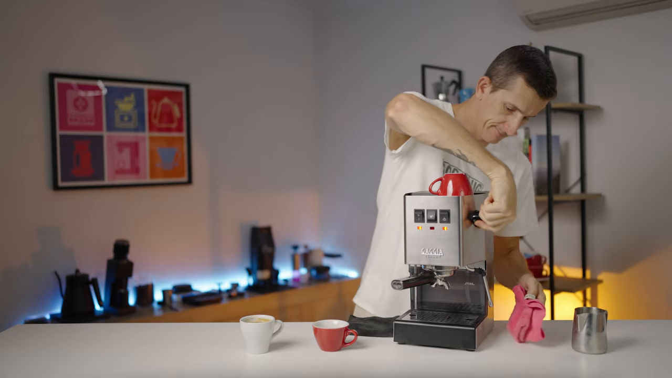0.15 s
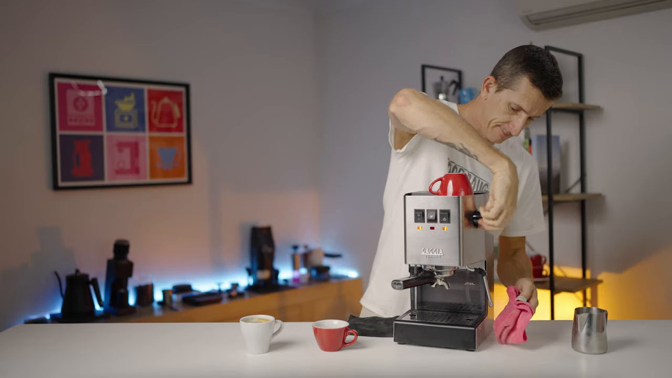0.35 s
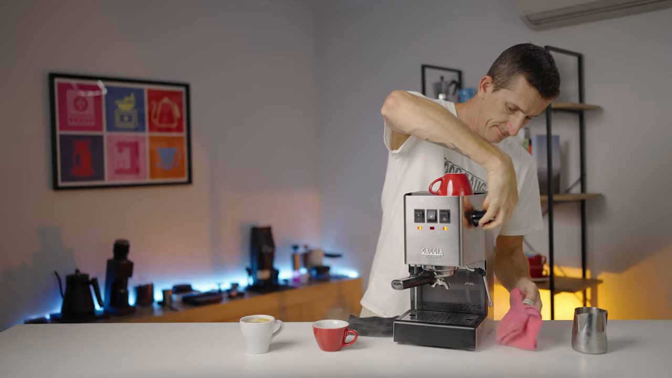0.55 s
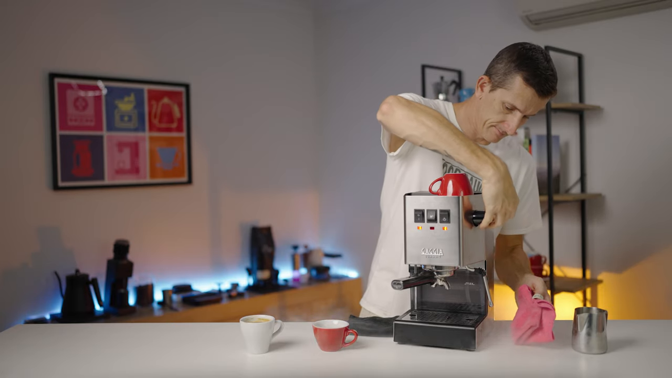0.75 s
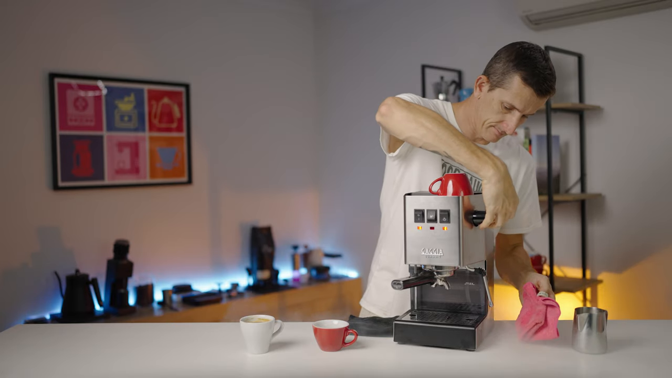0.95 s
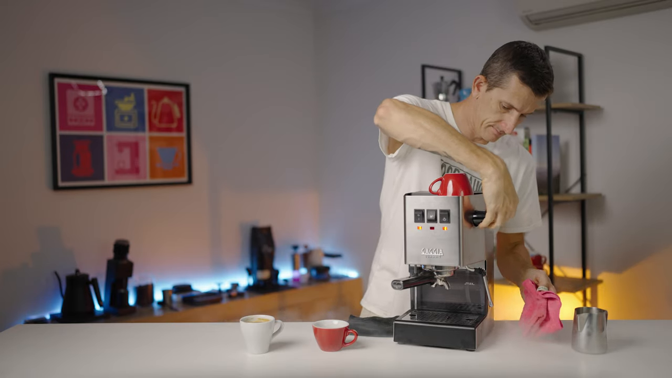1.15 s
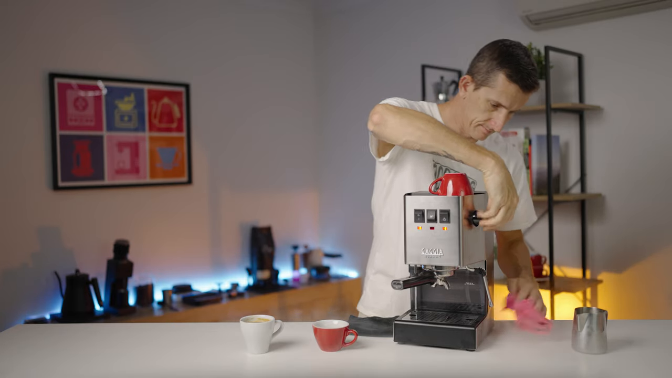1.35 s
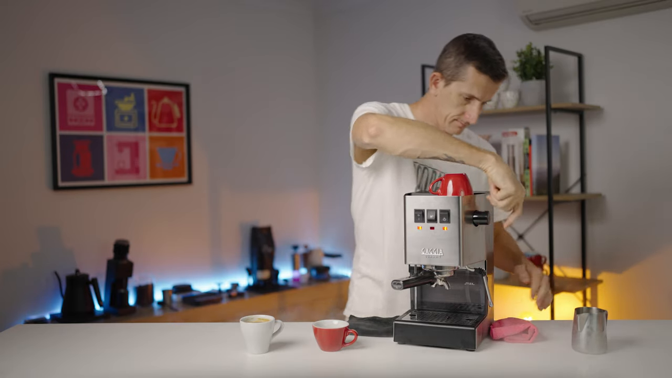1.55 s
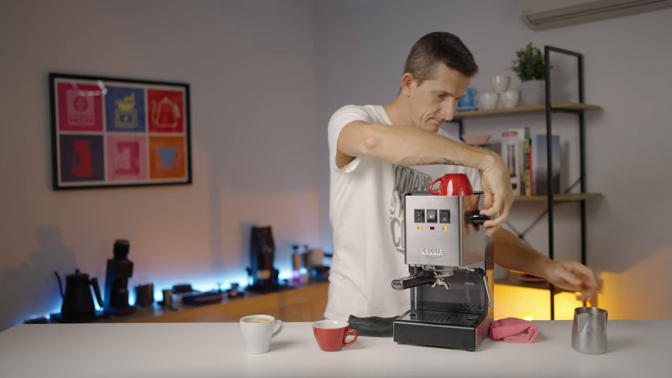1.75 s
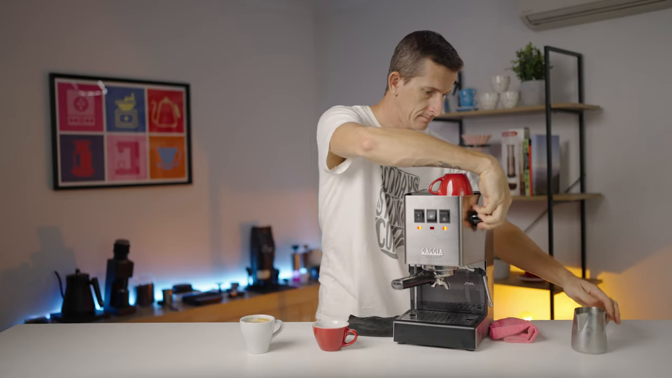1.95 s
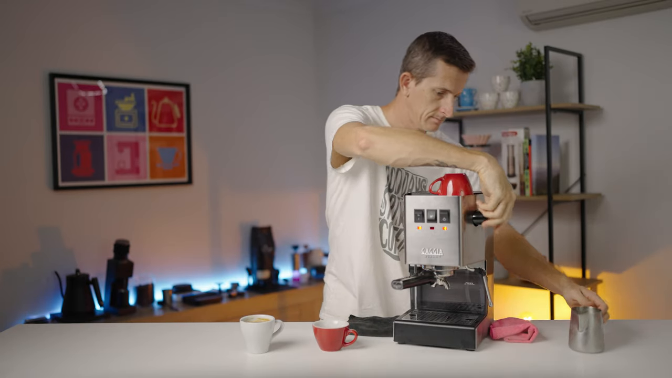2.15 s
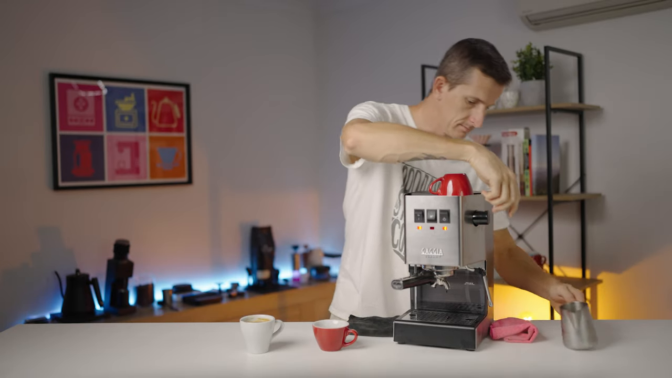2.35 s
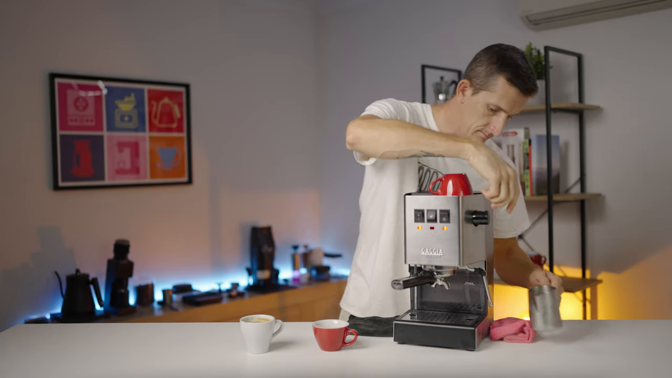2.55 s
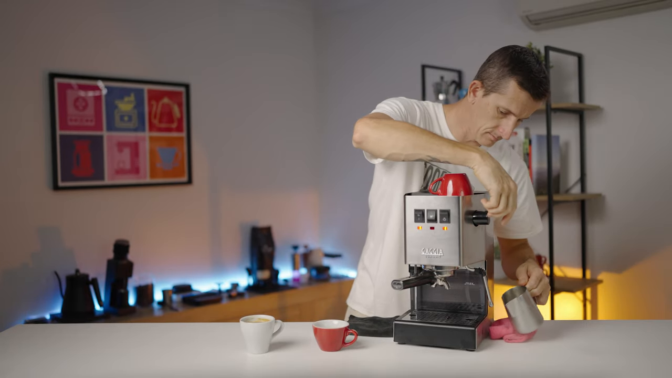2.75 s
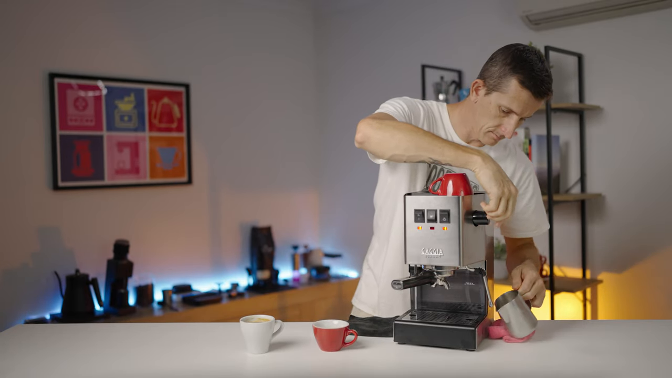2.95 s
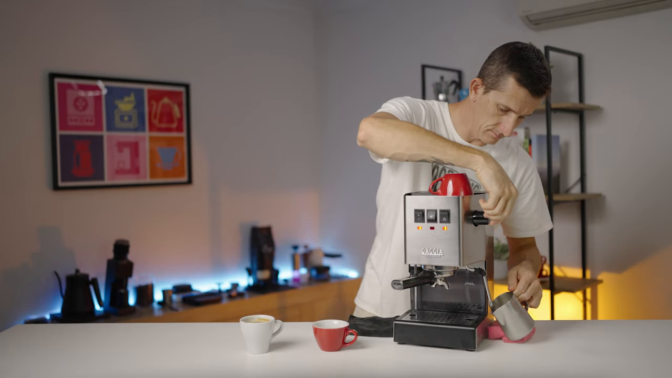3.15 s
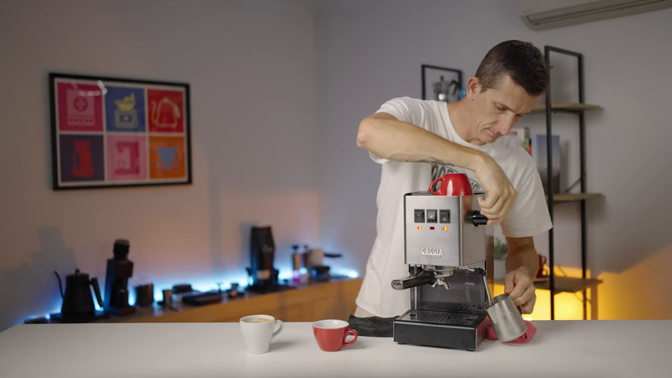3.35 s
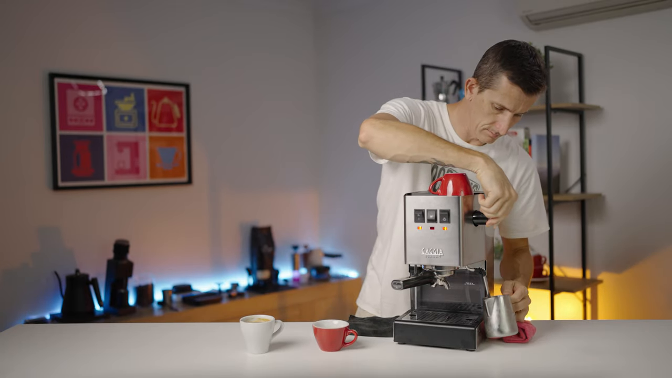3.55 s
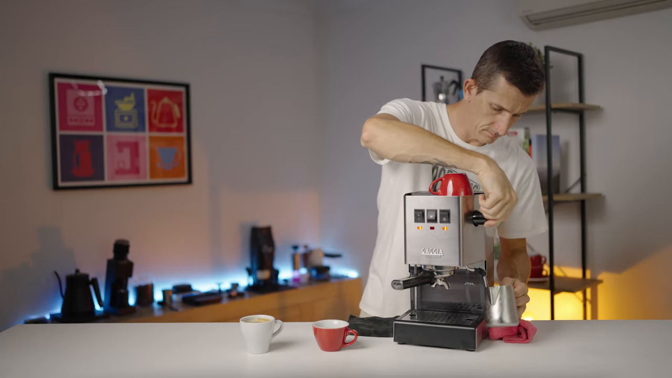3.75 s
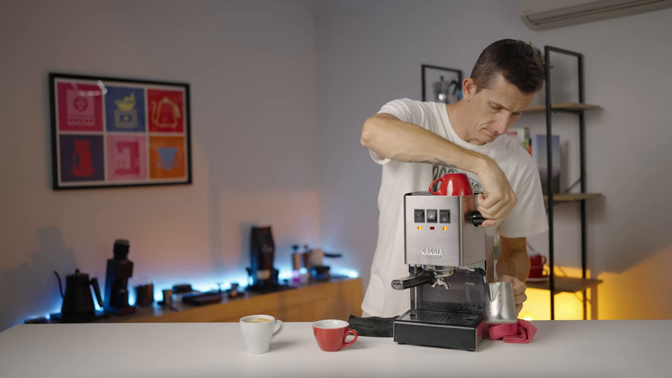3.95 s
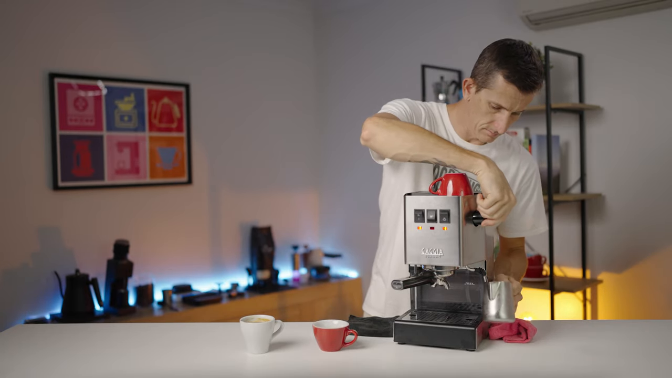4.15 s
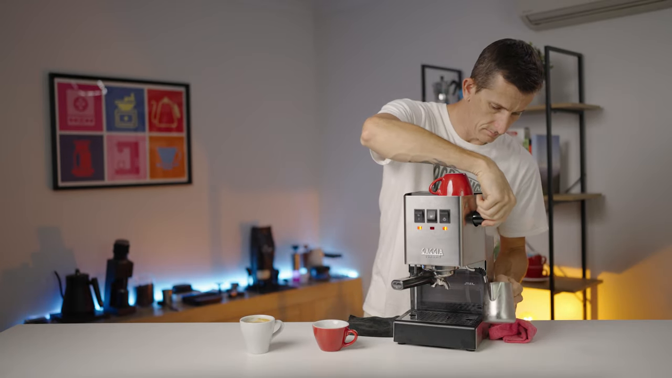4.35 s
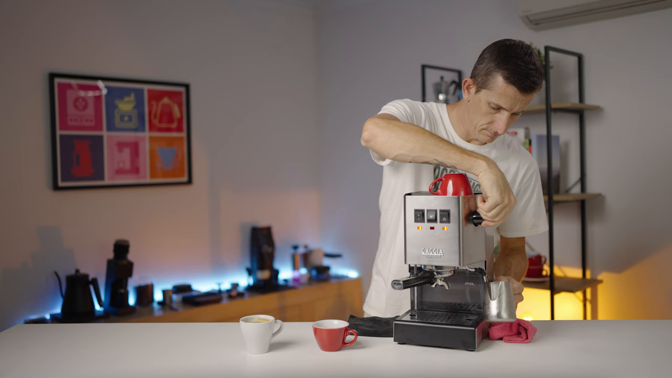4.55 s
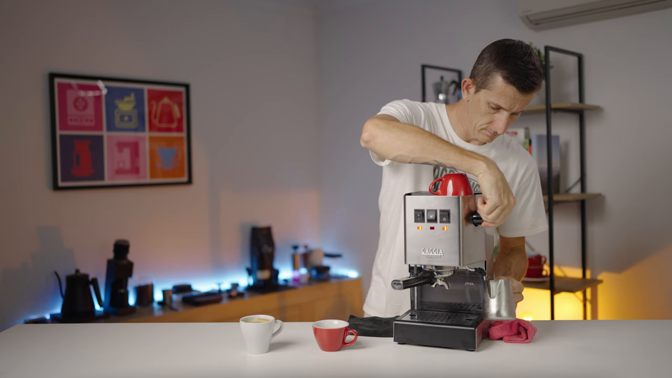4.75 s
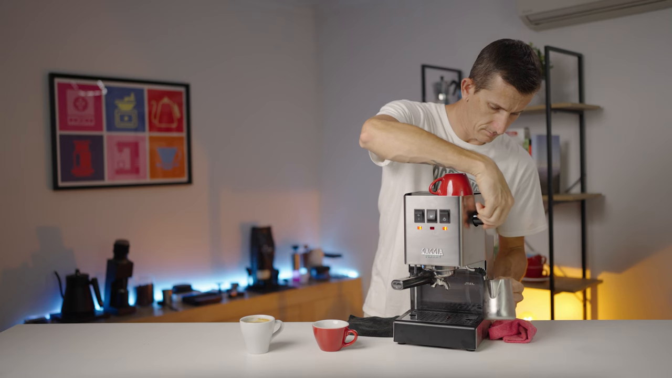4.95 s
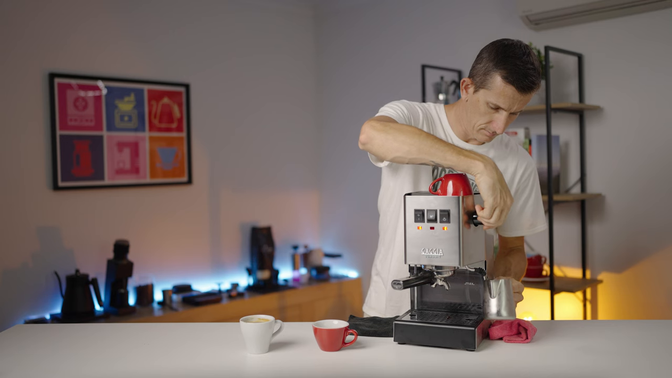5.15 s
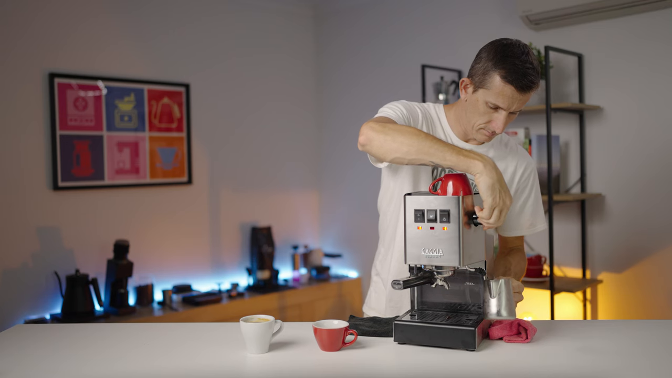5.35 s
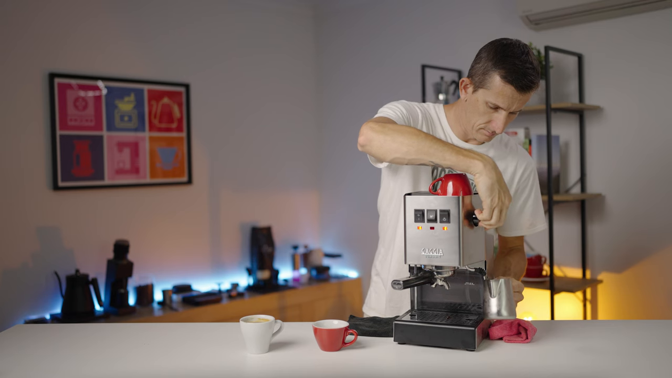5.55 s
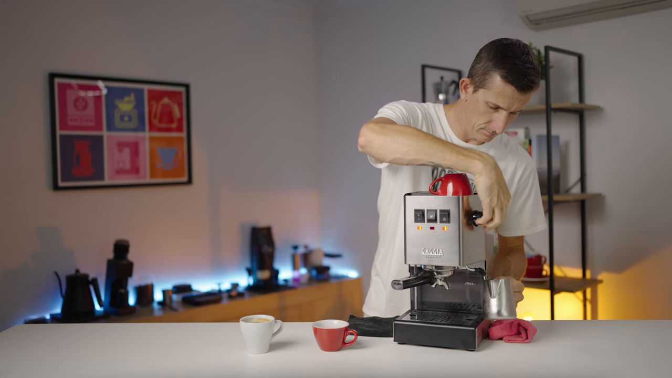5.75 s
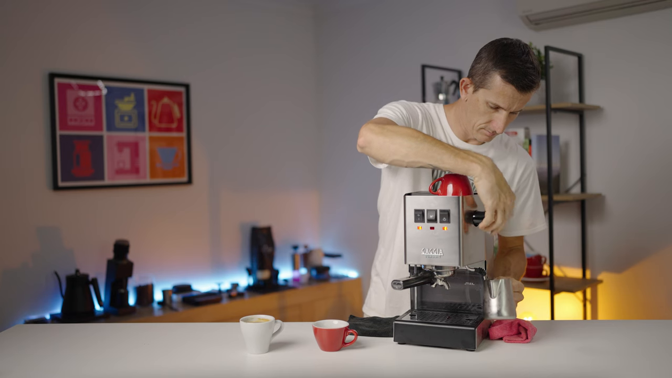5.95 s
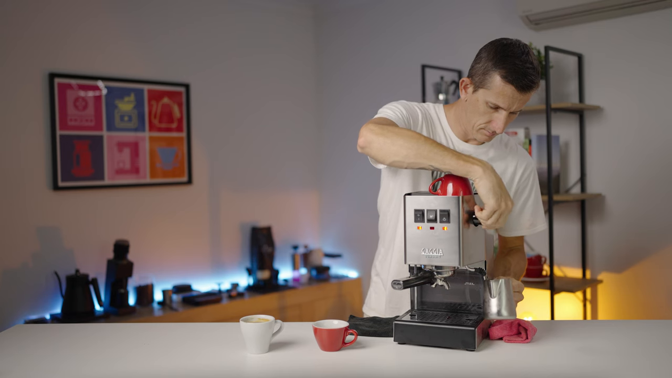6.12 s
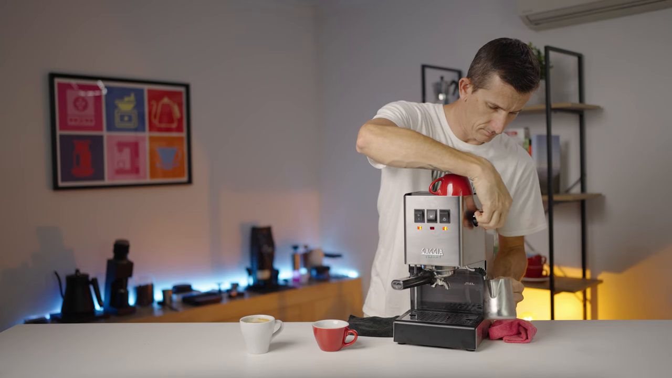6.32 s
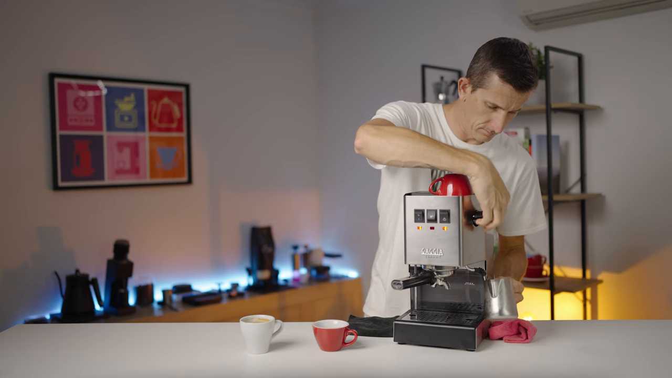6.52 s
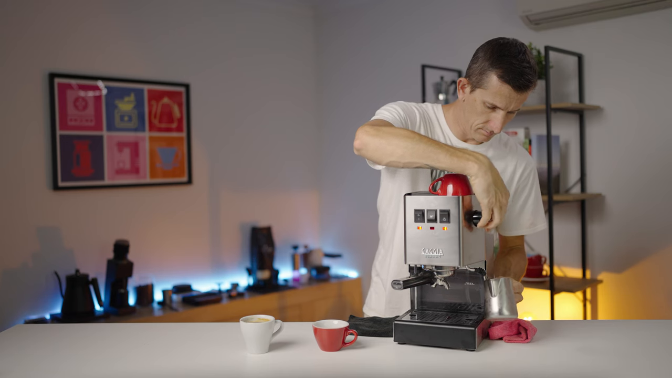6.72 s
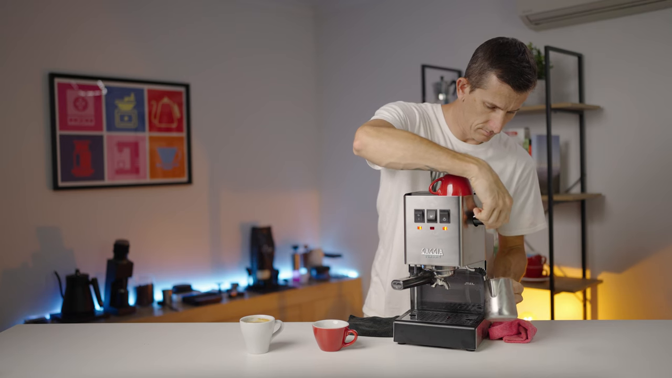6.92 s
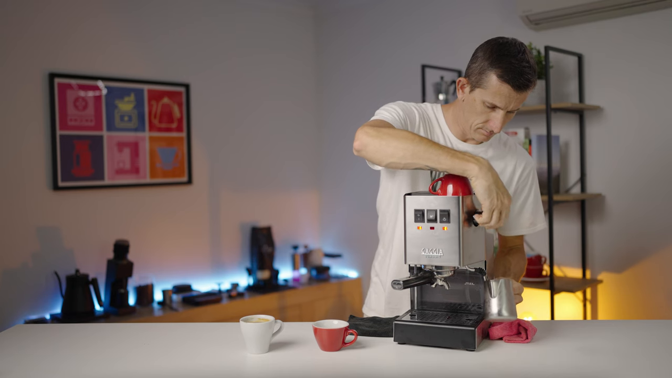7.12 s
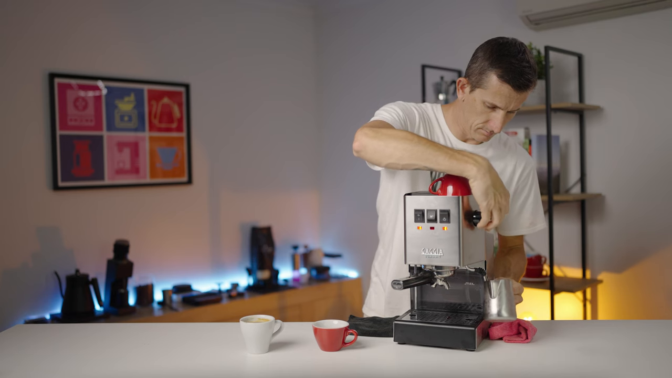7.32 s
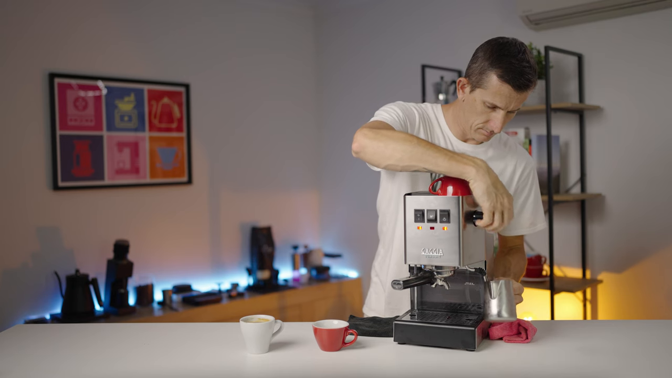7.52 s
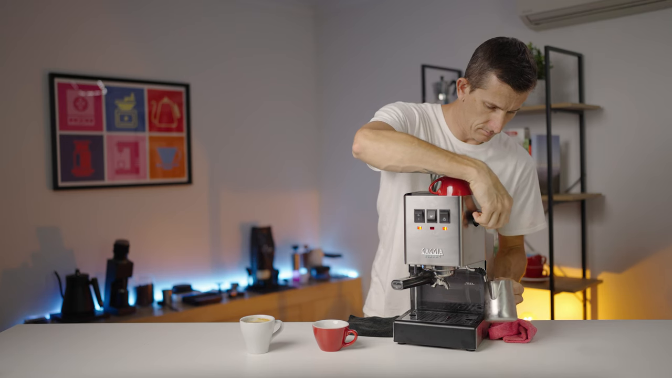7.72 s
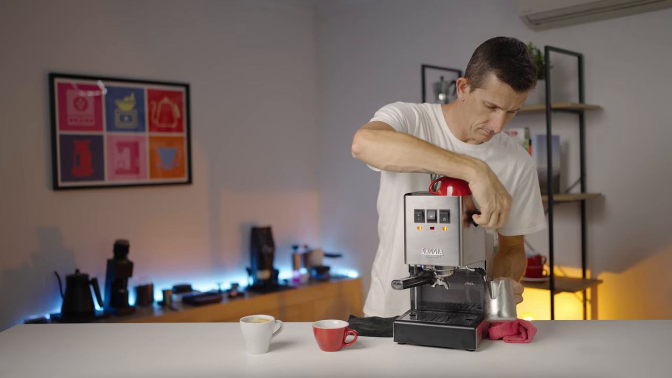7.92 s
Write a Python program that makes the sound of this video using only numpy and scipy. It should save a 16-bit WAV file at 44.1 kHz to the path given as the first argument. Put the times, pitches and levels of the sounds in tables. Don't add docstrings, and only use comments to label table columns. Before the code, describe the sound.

Single microphone in a furnished kitchen with soft appliance hum and faint hiss. An espresso machine's wand is purged into a cloth, hissing and roaring for over a second. Handling comes next: rustles, small clicks, a tiny finger squeak, thuds and a short metallic clank of the jug. Last, a loud steady jet in milk rings the steel wall, turns into a rough high screech, then breaks up in glugs, sloshes and sucked air.

```python
import sys
import numpy as np
from scipy import signal
from scipy.io import wavfile
from scipy.ndimage import uniform_filter1d, map_coordinates

SR = 44100
rng = np.random.default_rng(int(sys.argv[2]) if len(sys.argv) > 2 else 0)


def ratio_of_db(decibels):
    return 10 ** (np.asarray(decibels, float) / 20)


def materialize(psi):
    bounded = np.clip(np.atleast_2d(psi).T, -1, 1)
    quanta = np.round(bounded * 32767).astype(np.int16)
    wavfile.write(sys.argv[1], SR, quanta)


N = 356460
T = np.arange(N) / SR


def evened(x):
    return x / np.sqrt(np.mean(x ** 2) + 1e-20)


def played(rows):
    s, *columns = np.transpose(rows)
    gate = uniform_filter1d(1. * (T >= s[0]) * (T <= s[-1]), size=60)
    return gate, *(np.interp(T, s, c) for c in columns)


def coloured(x, shape, peaks=(), base_db=0, size=8192):
    hz = np.abs(np.fft.fftfreq(size, 1 / SR))
    f, db = np.transpose(shape)
    power = ratio_of_db(np.interp(np.log(hz + 1), np.log(f + 1), db) + base_db) ** 2
    for peak_hz, width_hz, peak_db in peaks:
        power = power + ratio_of_db(peak_db) ** 2 / (1 + (2 * (hz - peak_hz) / width_hz) ** 2)
    log_gain = np.log(power + 1e-10) / 2
    spectrum = np.exp(log_gain - 1j * signal.hilbert(log_gain).imag)
    kernel = np.fft.ifft(spectrum).real[:size // 2]
    return evened(signal.oaconvolve(x, kernel)[:N])


def resonate(x, hz, width_hz):
    turn = np.exp(2j * np.pi * np.cumsum(hz) / SR)
    r = np.exp(-np.pi * np.mean(width_hz) / SR)
    return 2 * (turn * signal.lfilter([1 - r], [1, -r], x / turn)).real


def turbulence(slow_db, slow_s, quick_db, quick_s):
    a, b, c = rng.standard_normal((3, N))
    slow = evened(uniform_filter1d(uniform_filter1d(b, int(slow_s * SR)), int(slow_s * SR)))
    quick = evened(uniform_filter1d(c, int(quick_s * SR) + 1))
    return evened(a * ratio_of_db(slow_db * slow + quick_db * quick))


def patchy(x, db, bins, frames):
    z = signal.stft(x, nperseg=512, noverlap=384)[2]
    field = uniform_filter1d(rng.standard_normal(z.shape), int(bins), 0)
    field = uniform_filter1d(field, int(frames), 1)
    return evened(signal.istft(z * ratio_of_db(db * evened(field)), nperseg=512, noverlap=384)[1][:N])


def bent(x, ratio):
    return map_coordinates(x, [np.cumsum(ratio)], order=3, mode="mirror")


def rings(rows, rise_s, spread):
    out, t = np.zeros(N), np.arange(SR // 2) / SR
    for s, db, hz, t60_s in rows:
        tone = np.sin(2 * np.pi * hz * t) + 0.69 * np.sin(2 * np.pi * hz * spread * t)
        part = out[round(s * SR):][:len(t)]
        part += (ratio_of_db(db - 60 * t / t60_s) * (1 - np.exp(-t / rise_s)) * tone)[:len(part)]
    return out


def burst(s, t60_s, rise_s):
    t = np.maximum(T - s, 0)
    return (1 - np.exp(-t / rise_s)) * ratio_of_db(-60 * t / t60_s)


def strokes(rows):
    skew, roundness = 0.7, 1
    power = np.zeros((2, N))
    for s, length_s, *db in rows:
        at = slice(max(round(s * SR), 0), round((s + length_s) * SR))
        phase = np.clip((T[at] - s) / length_s, 0, 1) ** skew
        arch = np.abs(np.sin(np.pi * phase)) ** roundness
        power[:, at] += (ratio_of_db(np.array(db))[:, None] * arch) ** 2
    return np.sqrt(power)


def kitchen():
    # f/Hz, density/dB per Hz
    hum_shape = [(24, -68), (40, -34), (150, 4.5), (325, -2), (377, 2.5), (548, -11), (621, -11),
                 (817, -21), (926, -7), (1380, -18.5), (2450, -58.5), (3740, -58.5), (15500, -70)]
    # f/Hz, density/dB per Hz
    hiss_shape = [(1500, -26.5), (2500, -1.5), (4000, -9), (6000, -11.5), (9000, -12.5), (15500, -14)]
    hiss = ratio_of_db(-75.5) * coloured(rng.standard_normal(N), hiss_shape)
    hum = coloured(turbulence(2.4, 0.021, 1.0, 0.009), hum_shape)
    return hiss + ratio_of_db(-49.5) * patchy(hum, 1.26, 3, 10)


def taps():
    # t/s, level/dB
    tap_events = [(2.341, -35), (2.474, -37), (2.655, -40), (2.692, -42), (2.733, -41), (2.784, -35),
                  (2.893, -42), (2.934, -43), (3.039, -38), (3.229, -45), (3.267, -39), (3.35, -35),
                  (3.399, -33), (3.506, -38), (3.537, -42), (3.666, -40), (3.764, -41), (4.023, -42),
                  (4.13, -46), (4.173, -43), (4.389, -45), (4.459, -54), (4.474, -39), (4.58, -39),
                  (4.601, -43), (4.649, -46), (4.732, -51), (4.747, -48), (4.782, -50), (4.805, -46),
                  (4.816, -43), (4.849, -44), (4.908, -47)]
    # f/Hz, density/dB per Hz
    tap_shape = [(300, -20), (900, 2), (1500, -1), (2800, -15), (3600, -22), (6000, -43), (12000, -70)]
    # t/s, level/dB, f/Hz
    squeak_curve = [(3.09, -62, 2600), (3.13, -52, 2770), (3.17, -56, 2910), (3.21, -67, 3010),
                    (3.27, -71, 3020)]
    # t/s, level/dB, f/Hz
    thuds = [(0.976, -29, 460), (1.04, -23, 153), (1.108, -32, 232), (1.171, -24, 243), (1.432, -32, 443),
             (1.547, -35, 464), (1.66, -43, 385), (1.807, -34, 150), (1.907, -46, 234), (2.046, -39, 282),
             (2.257, -34, 402), (2.307, -35, 225), (2.382, -33, 226), (2.598, -40.5, 264),
             (2.729, -34, 256), (3.173, -36, 151), (3.33, -33, 240), (3.408, -36, 213), (3.502, -33.5, 266),
             (3.614, -42, 350), (3.793, -38, 253), (3.945, -51, 250), (4.021, -40, 225), (4.065, -37, 234),
             (4.411, -36, 256), (4.52, -42, 177), (4.647, -34, 262), (4.742, -36, 374), (4.803, -34, 186),
             (4.86, -37, 198)]
    smear_t60_s, thud_t60_s = 0.015, 0.092
    train, t = np.zeros(N), np.arange(1024) / SR
    s, db = np.transpose(tap_events)
    train[np.round(s * SR).astype(int)] = ratio_of_db(db)
    smear = np.where(t == 0, 1, 1.4 * rng.standard_normal(len(t))) * ratio_of_db(-60 * t / smear_t60_s)
    blows = signal.oaconvolve(train, smear)[:N]
    clicks = np.sqrt(np.mean(train ** 2)) * coloured(blows, tap_shape)
    gate, squeak_db, hz = played(squeak_curve)
    squeak = gate * ratio_of_db(squeak_db) * evened(resonate(turbulence(2, .01, 1, .002), hz, 45))
    bumps = rings([(*row, thud_t60_s) for row in thuds], 0.0045, 1.072)
    return ratio_of_db(11) * clicks + squeak + ratio_of_db(-2.5) * bumps


def handling():
    # f/Hz, density/dB per Hz
    rub_shape = [(240, -15), (400, -4.5), (555, -12), (630, -8), (865, 1), (1190, -3), (1480, -1.5),
                 (2360, -4), (5000, -26), (6500, -82), (11000, -120)]
    # f/Hz, density/dB per Hz
    crisp_shape = [(2060, -15), (3500, -8.5), (4550, -15.5), (4960, -15), (6400, -22), (6990, -18.5),
                   (9190, -31), (15500, -54)]
    # f/Hz, width/Hz, level/dB
    rub_ring = [(1080, 300, -19), (1700, 140, -6.5), (2500, 230, -6.5), (3080, 33, -16), (4740, 39, -33),
                (6740, 160, -28)]
    # f/Hz, width/Hz, level/dB
    wet_ring = [(5000, 130, 1), (5330, 110, -5), (5600, 83, 4), (6030, 90, -5), (6360, 56, -4),
                (6930, 130, -2)]
    # start/s, length/s, rub/dB, crisp/dB
    cloth_strokes = [(-0.03, 0.11, -46.5, -56.5), (0.06, 0.099, -49.5, -56.5), (0.16, 0.089, -46, -54.5),
                     (0.23, 0.11, -45.5, -56), (0.31, 0.12, -49.5, -54), (1.5, 0.75, -51, -48.5),
                     (1.995, 0.31, -48, -52), (2.2, 0.34, -50.5, -58.5), (2.44, 0.21, -48, -55),
                     (2.6, 0.19, -56.5, -81), (2.75, 0.13, -47, -63), (2.84, 0.25, -60, -72),
                     (3.0, 0.084, -49.5, -64), (3.06, 0.17, -53, -58.5), (3.265, 0.11, -50.5, -74),
                     (3.34, 0.098, -45.5, -61), (3.41, 0.08, -46.5, -62), (3.48, 0.28, -56, -82),
                     (3.71, 0.24, -54.5, -78)]
    # start/s, length/s, rub/dB, wall ring/dB
    dipped_strokes = [(3.93, 0.38, -66, -72.5), (4.28, 0.098, -64, -79), (4.38, 0.24, -72, -86),
                      (4.495, 0.088, -47, -75), (4.59, 0.16, -69, -75), (4.72, 0.47, -69, -100)]
    # t/s, level/dB, crisp/dB
    ticks = [(2.373, -22.5, -50), (2.971, -22, -57), (3.07, -21, -63), (3.267, -32, -68), (3.3, -28, -50),
             (3.348, -40, -58), (3.385, -40, -56), (3.4, -38, -53), (3.435, -42, -60), (3.462, -44, -62),
             (3.506, -41, -77), (3.575, -43, -50), (3.6, -47, -64), (3.71, -28, -62), (3.725, -32, -52),
             (4.13, -44, -76), (4.173, -40, -80), (4.209, -60, -67), (4.281, -33, -68), (4.407, -34, -76),
             (4.493, -25, -69), (4.52, -38, -63), (4.545, -50, -62), (4.732, -47, -79), (4.816, -49, -87)]
    # t/s, level/dB, f/Hz, t60/s
    pings = [(2.555, -36, 3320, 0.043), (2.7, -54, 7900, 0.15), (3.362, -32, 1150, 0.043),
             (3.7, -25, 1230, 0.04), (3, -29, 1400, 0.044), (2.8, -39, 2350, .04), (3.072, -36, 1290, .06),
             (3.888, -38, 8100, 0.093), (4.94, -46, 5860, 0.022)]
    rub = coloured(turbulence(1.8, .008, 3.2, .0015), rub_shape, rub_ring, base_db=-2.5)
    crisp = coloured(turbulence(2, .006, 4, .0007), crisp_shape)
    wet = coloured(turbulence(2.4, .02, 1.5, .001), crisp_shape, wet_ring, base_db=-12)
    soft, sharp = strokes(cloth_strokes)
    dipped, ringing = strokes(dipped_strokes)
    knocks = np.zeros((2, N))
    for s, db, crisp_db in ticks:
        knocks += burst(s, 0.095, 0.0016) * ratio_of_db(np.array([[db - 17.0], [crisp_db]]))
    blow = turbulence(1, .004, 1.5, .001)
    struck = knocks[0] * coloured(blow, rub_shape, rub_ring, base_db=-5.0)
    struck = struck + knocks[1] * coloured(blow, crisp_shape)
    moves = (soft + dipped) * rub + sharp * crisp + struck + ringing * wet
    return moves + rings(pings, .006, 1.015)


def clank():
    # f/Hz, level/dB
    jug = [(898, -3), (1614, -10), (1777, -5), (2870, -6), (2950, -4), (3670, -14), (4689, -9), (5250, -10),
           (5720, -13), (6050, -11), (6400, -11), (6730, -14), (8145, -16), (9970, -13)]
    # f/Hz, density/dB per Hz
    scrape_shape = [(290, -54), (500, -7), (888, -9), (2690, -8), (2930, -3), (15500, -21.5)]
    clank_s, rise_s, scrape_s, damped_t60_s = 3.8385, 0.00088, 0.087, 0.044
    loss_db_per_hz_s = .02
    t = np.maximum(T - clank_s, 0)
    damped = ratio_of_db(-60 * np.maximum(t - scrape_s, 0) / damped_t60_s)
    sag = ratio_of_db(-13.5 * np.minimum(t / scrape_s, 1) ** 1.9)
    linger = ratio_of_db(-20) * burst(clank_s, 0.97, rise_s)
    shape = (1 - np.exp(-t / rise_s)) * sag * damped + linger
    struck = np.zeros(N)
    for hz, db in jug:
        decay = ratio_of_db(db - loss_db_per_hz_s * hz * np.minimum(t, .3))
        struck += 0.86 * decay * np.sin(2 * np.pi * (hz * T + rng.random()))
    modes = [(hz, 35, db) for hz, db in jug]
    scraped = coloured(turbulence(1, 0.0047, 4.6, 0.00033), scrape_shape, modes, base_db=-11)
    return ratio_of_db(-33) * shape * (ratio_of_db(-2.5) * struck + ratio_of_db(-4) * scraped)


def purge():
    # t/s, jet/dB, nearness of the cloth/dB
    flow = [(0.34, -70, -12), (0.365, -46, -9.5), (0.7, -39, -2.5), (0.985, -37.5, -6.5),
            (1.02, -33.5, -4.5), (1.42, -32, -6.5), (1.53, -38.5, -6), (1.9, -46.5, -9), (2.85, -77, 8)]
    # f/Hz, density/dB per Hz
    jet_shape = [(710, -15.5), (1200, -2), (2340, -5.5), (6770, 1), (7790, -8), (8490, -8), (9060, -16),
                 (12200, -4.5), (15700, -9)]
    # f/Hz, width/Hz, level/dB
    nozzle = [(4980, 14.6, -14), (7000, 400, -10), (8460, 165, -1.5), (9900, 1500, -8), (12000, 320, -11)]
    # f/Hz, density/dB per Hz
    roar_shape = [(35, -100), (70, -43), (226, 3), (308, -7.5), (480, 1.5), (700, -5.5), (920, -1.5),
                  (1300, -8), (3000, -15.5), (3900, -34), (6600, -120)]
    # t/s, level/dB, f/Hz
    pocket = [(0.5, -15, 800), (0.62, -9, 860), (0.88, -2, 915), (1.0, -12, 600), (1.1, -15, 493),
              (1.3, -3, 570), (1.45, -8.5, 580), (1.6, -16, 500)]
    # t/s, level/dB, f/Hz, t60/s
    spit = [(1.046, -27, 137.4, 0.42)]
    gate, jet_db, cloth_db = played(flow)
    jet = coloured(turbulence(0.33, 0.019, 1.3, 0.0013), jet_shape, nozzle, base_db=-8.0)
    roar = coloured(turbulence(0.98, 0.011, 1.0, 0.001), roar_shape)
    near, pocket_db, pocket_hz = played(pocket)
    roar = patchy(roar + near * ratio_of_db(pocket_db) * resonate(roar, pocket_hz, 190), 0.89, 3, 17)
    steam = gate * ratio_of_db(jet_db) * (ratio_of_db(3.0) * jet + ratio_of_db(cloth_db) * roar)
    return steam + ratio_of_db(-10.5) * rings(spit, 0.002, 0.93)


def surface():
    # t/s, glug/dB, slosh/dB, sucked air/dB, t60/s
    breaks = [(7.191, -30, -47, -45, 0.093), (7.462, -25.5, -39, -54, 0.13), (7.539, -56, -56, -42, 0.23),
              (7.615, -33, -42.5, -53, 0.4), (7.653, -41, -36, -41, 0.27), (7.679, -34, -37, -49, 0.2),
              (7.699, -41, -31, -51, 0.18), (7.762, -30, -27, -53, 0.13), (7.812, -25.5, -35, -56, 0.21),
              (7.829, -25, -49, -53, 0.11), (7.904, -34, -68, -27.5, 0.29), (7.932, -25.5, -63, -43, 0.4),
              (7.969, -39, -66, -45, 0.17), (8.041, -38, -39, -49, 0.49)]
    # f/Hz, density/dB per Hz
    glug_shape = [(350, -68), (600, -21), (887, -7.5), (1020, 4), (1200, -7), (1400, -15), (1800, -30),
                  (2340, -41), (3960, -120)]
    # f/Hz, density/dB per Hz
    slosh_shape = [(59, -41), (100, -44), (125, -33), (221, 0.5), (447, 0), (518, -2.5), (800, -13),
                   (1040, -61), (1760, -120)]
    # t/s, level/dB, f/Hz
    burble_curve = [(7.9, -49, 1020), (7.935, -34, 1030), (7.96, -39, 1080), (8.02, -45, 1130),
                    (8.045, -57, 1037), (8.09, -46, 1050)]
    glug = coloured(turbulence(2.0, 0.0029, 0.8, 0.0015), glug_shape)
    slosh = coloured(turbulence(1.2, 0.013, 0.84, 0.00047), slosh_shape)
    suck = evened(resonate(turbulence(1.5, 0.0065, 1.2, 0.0013), np.full(N, 1950.), 1200))
    gate, db, hz = played(burble_curve)
    pocket_noise = resonate(turbulence(1.8, 0.0065, 1, .002), hz, 120)
    out = gate * ratio_of_db(db) * evened(resonate(pocket_noise, hz, 300))
    for s, glug_db, slosh_db, suck_db, t60_s in breaks:
        mixed = ratio_of_db(glug_db - 7.5) * glug + ratio_of_db(slosh_db - 4.5) * slosh + ratio_of_db(suck_db - 8) * suck
        out = out + burst(s, t60_s, 0.0022) * mixed
    return out


def steaming():
    # t/s, flow/dB, bubble cloud over flow/dB, cloud f/Hz
    steam = [(4.976, -58, 15, 3060), (4.992, -35.5, -12, 3050), (5.01, -30.5, -4.5, 3100),
             (5.14, -28.5, -6, 3080), (5.2, -31.5, -2, 3190), (5.62, -29.5, -10.5, 2888),
             (5.72, -29.5, -3, 2500), (5.95, -29.5, 1.4, 2825), (6.3, -30, 4.5, 2950),
             (6.5, -29.5, 1, 2840), (6.85, -28, 2.2, 2830), (6.97, -29, 4.5, 2857), (7.3, -29.5, 1.5, 3050),
             (7.48, -34.5, 4, 2830), (7.598, -39.5, 11.5, 3510), (7.78, -48, 5, 3490),
             (8.09, -38.5, 0.5, 3250)]
    # start/s, length/s, flow/dB, cloud/dB
    puffs = [(7.615, 0.2, -31.5, -32), (7.8, 0.084, -29.5, -38), (7.85, 0.14, -44, -33),
             (7.93, 0.23, -32, -51)]
    # f/Hz, density/dB per Hz
    shallow_shape = [(1000, -52), (1700, -23), (2180, -7.5), (2890, -5.5), (3850, -7.5), (5480, -9.5),
                     (6980, -6), (8730, -5.5), (11900, -11), (15700, -14)]
    # f/Hz, width/Hz, level/dB
    shallow_ring = [(4280, 21, -1), (4550, 40, -10), (4700, 29, -3), (5360, 24, -4.5), (5660, 26, -11),
                    (5910, 19, 0.5), (6490, 25, -5.5), (6850, 38, -12), (7830, 44, -5.5), (8840, 58, -19),
                    (10900, 78, -23), (11400, 39, -8.5), (12000, 57, -13.5)]
    # f/Hz, density/dB per Hz
    deep_shape = [(1000, -18.5), (1700, -14), (2090, -21.5), (2860, 3.5), (4000, -14), (5530, -5),
                  (7310, -13.5), (8030, -15.5), (10100, -9.5), (11100, -17), (15700, -12)]
    # f/Hz, width/Hz, level/dB
    deep_ring = [(4310, 45, -4), (5400, 68, 1), (5330, 22, -6.5), (5650, 37, -4), (6340, 49, -12),
                 (6470, 63, 0), (7800, 45, -3), (8100, 59, -2.5), (8600, 81, -10), (10810, 76, -5),
                 (11400, 150, -7.5), (12000, 81, -7), (13500, 200, -11)]
    # f/Hz, density/dB per Hz
    sputter_shape = [(1000, -46), (1700, -38), (2030, -34), (2660, -17), (3350, -10.5), (4350, -13.5),
                     (5190, -5), (5910, -9.5), (8330, -8.5), (14700, -11.5), (15700, -19)]
    # t/s, three resonances f/Hz
    column_curve = [(4.98, 5540, 9260, 12000), (5.35, 5200, 9060, 12000), (5.6, 5100, 8200, 11600),
                    (5.9, 5400, 7970, 12000), (6.4, 5680, 8300, 11400), (6.8, 6000, 8900, 11140),
                    (7.4, 5600, 8700, 11240)]
    column_db = [5.5, 6.5, 6]
    # f/Hz, density/dB per Hz
    gurgle_shape = [(290, -49), (500, -30), (757, -22), (868, 14.5), (947, -2), (1030, 10.5), (2200, -15),
                    (2860, -40), (4840, -120)]
    # f/Hz, width/Hz, level/dB
    gurgle_ring = [(860, 28, -5), (980, 610, -4), (1588, 59, 5.5)]
    # f/Hz, gain/dB
    full_shape = [(2100, -9), (2500, -3)]
    # f/Hz, width/Hz, level/dB
    full_ring = [(2550, 18, 4.8), (2796, 30, 9), (2922, 110, 5.9), (3100, 20, 2), (3400, 43, 6.8)]
    # t/s, level/dB, f/Hz
    gulp_events = [(7.3917, -16, 2940), (7.5384, -5, 2910), (7.5763, -14.5, 3470), (7.6097, -6.5, 2980),
                   (7.6641, -8.5, 3310), (7.682, -1.5, 3260), (7.8701, -12, 3260)]

    gate, flow_db, cloud_db, cloud_hz = played(steam)
    puff, puff_cloud = strokes(puffs)
    depth = np.interp(T, [5.3, 5.65, 5.95, 6.3], [0, .3, .8, 1])
    surfaced = np.interp(T, [7.42, 7.62], [0, 1])

    ring_up_s, sag_per_s = .09, .013
    shallow = coloured(turbulence(1.0, 0.18, 0.89, 0.0005), shallow_shape, shallow_ring, base_db=-13.5)
    unrung = coloured(turbulence(0.89, .01, 1, .001), shallow_shape)
    rung = np.clip((T - steam[0][0]) / ring_up_s, 0, 1)
    shallow = rung * shallow + np.sqrt(1 - rung ** 2) * unrung
    shallow = bent(shallow, 1 - sag_per_s * np.clip(T - 5.3, -.4, 1))

    deep = coloured(turbulence(0.31, 0.0073, 0.72, 0.00058), deep_shape, deep_ring, base_db=-1.5)
    sway = 0.00407 * np.sin(2 * np.pi * 1.3 * T) + 0.00308 * np.sin(2 * np.pi * 3.1 * T)
    deep = bent(deep, 1 + sway)
    sinking = resonate(deep, 5210 - 150 * (T - 6.2), 15)
    valley_gain = np.clip(1.1 * (flow_db + 29.0), -.8, 1)
    opened = valley_gain * resonate(deep, np.full(N, 4430), 1600)
    deep = deep + ratio_of_db(11) * sinking + opened

    sputter = coloured(turbulence(0.95, 0.011, 1.3, 0.0011), sputter_shape)
    hiss = np.sqrt(1 - depth) * shallow + np.sqrt(depth * (1 - surfaced)) * deep
    hiss = hiss + np.sqrt(surfaced) * sputter
    column = sum(ratio_of_db(db) * resonate(hiss, hz, hz * 0.076)
                 for hz, db in zip(played(column_curve)[1:], column_db))
    hiss = patchy(hiss + (1 - surfaced) * column, 1.6, 5, 48.6)
    hiss = patchy(hiss, 1.5, 2, 18)

    pulses = turbulence(2, .004, 1, .002)
    wander = uniform_filter1d(rng.standard_normal(N), size=4000)
    wander_hz = 29.58 * evened(uniform_filter1d(wander, size=4000))
    cloud = resonate(resonate(pulses, cloud_hz, 414), cloud_hz, 1160)
    cloud = coloured(cloud, full_shape, full_ring)
    cloud = bent(cloud, 1 + (wander_hz - wander_hz.mean()) / cloud_hz)
    jet = ratio_of_db(2.1) * np.hypot(ratio_of_db(flow_db), puff) * hiss
    jet = jet + ratio_of_db(-3.5) * np.hypot(ratio_of_db(flow_db + cloud_db), puff_cloud) * cloud

    gurgle = coloured(turbulence(0.77, 0.011, 0.66, 0.0035), gurgle_shape, gurgle_ring, base_db=-1.5)
    shallow_db, deep_db, out_db = -5, -25.5, -49
    surge_db = 1.5 * depth * np.maximum(flow_db + 24.0, 0)
    sunk_db = shallow_db + (deep_db - shallow_db) * depth ** 0.86 + surge_db
    milk = np.hypot(ratio_of_db(flow_db + sunk_db), ratio_of_db(out_db) * surfaced) * gurgle
    gulps = rings([(*row, 0.023) for row in gulp_events], .004, 1.04)
    low_cut = signal.butter(2, 600, "high", fs=SR, output="sos")
    return signal.sosfilt(low_cut, gate * (jet + milk) + gulps)


def room(x):
    t = np.arange(SR // 2) / SR
    echoes = rng.choice([-1., 1.], len(t)) * (rng.random(len(t)) < .05) * (t > .004)
    low = signal.lfilter([.3], [1, -.7], echoes)
    tail = low * ratio_of_db(-60 * t / 0.24) + (echoes - low) * ratio_of_db(-60 * t / 0.26)
    return signal.oaconvolve(x, tail / np.linalg.norm(tail))[:N]


def scene():
    near = taps() + handling() + clank() + purge() + surface() + steaming()
    near = signal.sosfilt(signal.butter(2, 90, "high", fs=SR, output="sos"), near)
    mix = ratio_of_db(-1.0) * near + ratio_of_db(-5.0) * room(near) + kitchen()
    return np.array([mix, mix])


def low_pass(x):
    return signal.sosfilt(signal.butter(12, 15820, fs=SR, output="sos"), x)


def record(dry):
    cut = signal.sosfilt(signal.butter(2, 45, "high", fs=SR, output="sos"), dry)
    edge = signal.firwin(2001, 15745, window=("kaiser", 9), fs=SR)
    return low_pass(signal.oaconvolve(cut, edge[None], "same"))


dry = scene()
out = record(dry)
materialize(out)
```